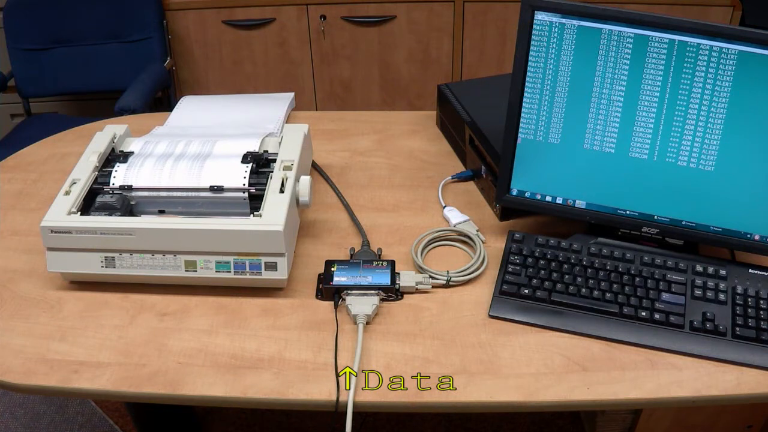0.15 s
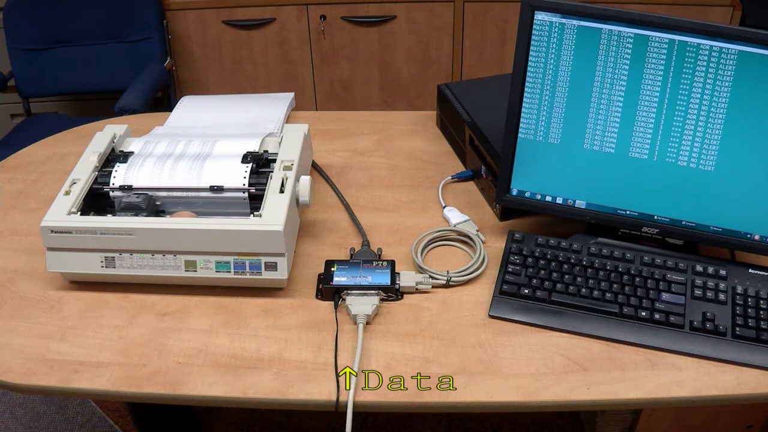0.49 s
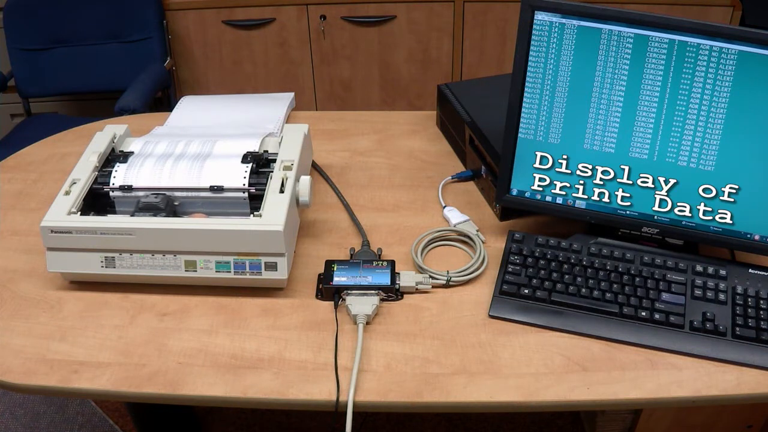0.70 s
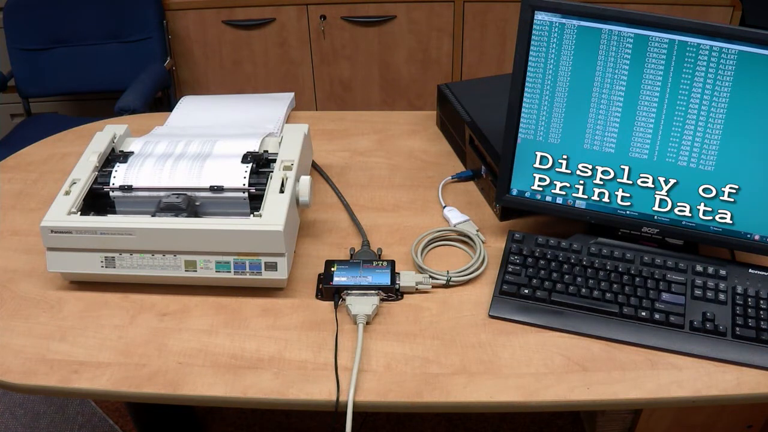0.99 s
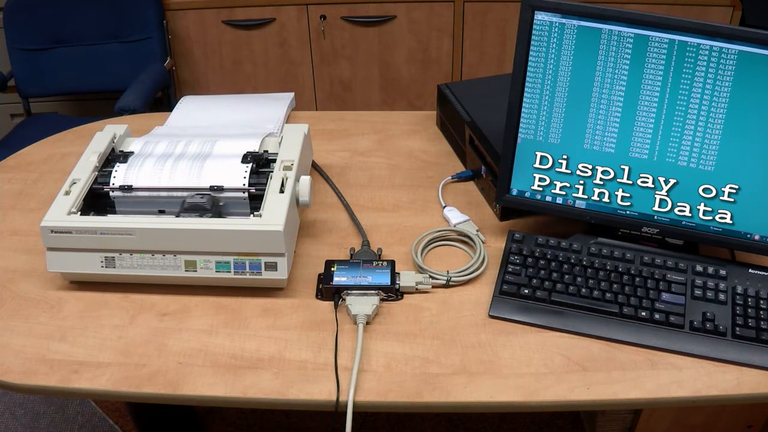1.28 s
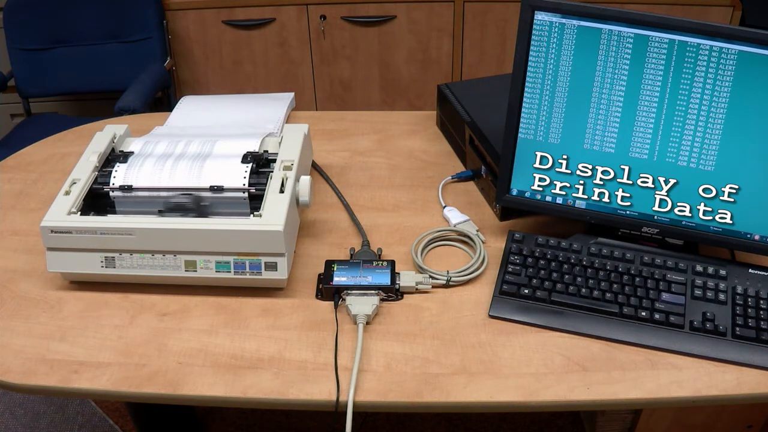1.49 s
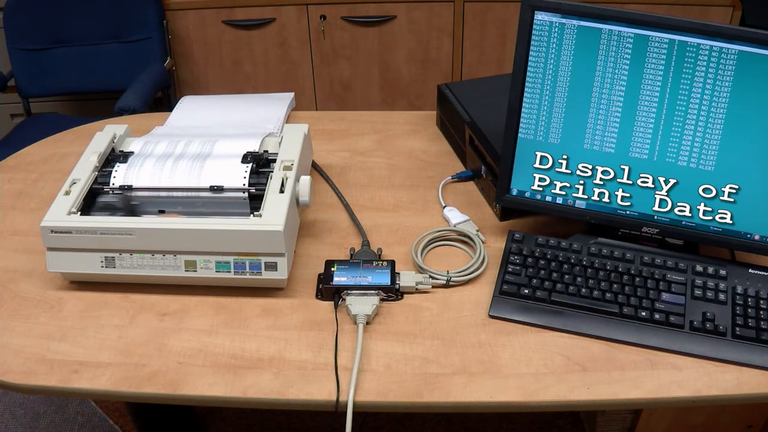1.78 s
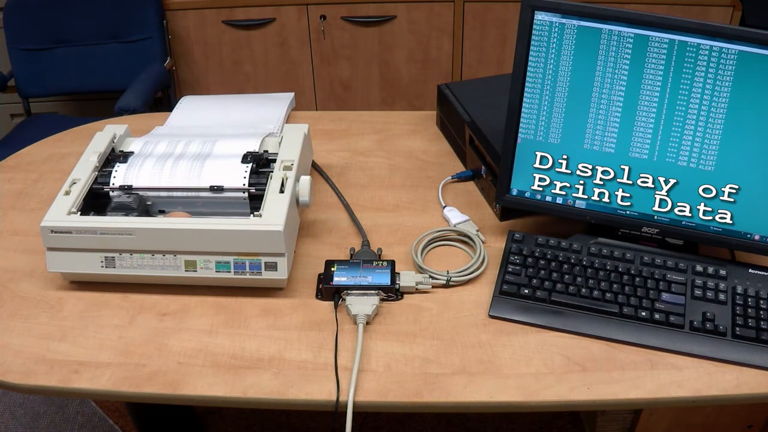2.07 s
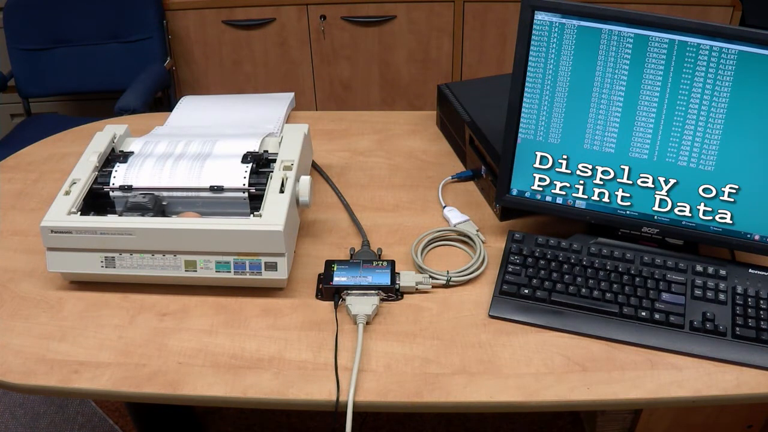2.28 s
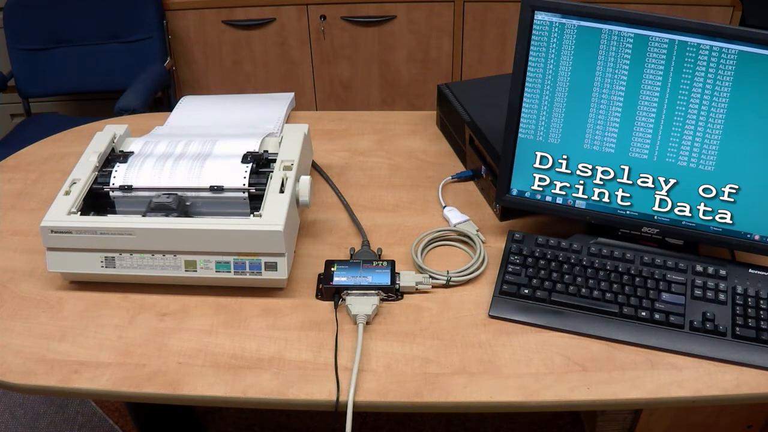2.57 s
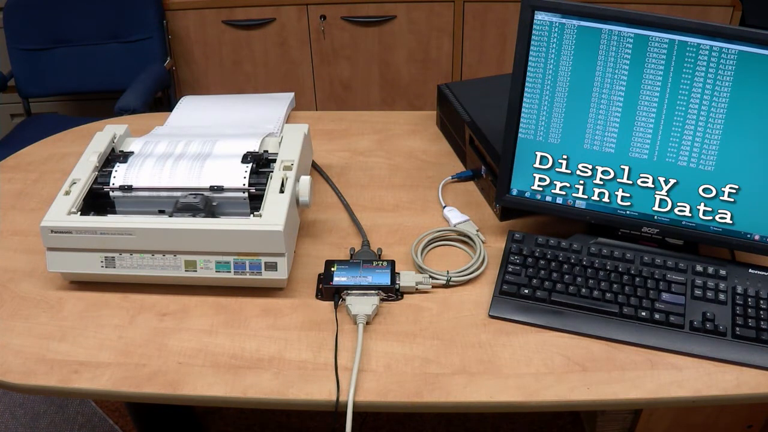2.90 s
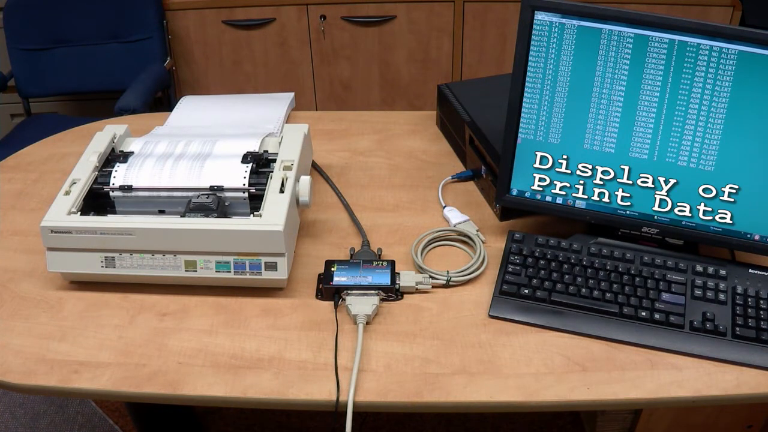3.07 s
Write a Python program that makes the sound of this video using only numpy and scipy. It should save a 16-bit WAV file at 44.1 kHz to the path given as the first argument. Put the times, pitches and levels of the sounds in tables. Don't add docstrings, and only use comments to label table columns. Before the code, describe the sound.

A dot matrix printer buzzes out two lines in harsh, raspy bursts, carriage clacking back between.

```python
import sys
import numpy as np
from scipy import signal
from scipy.fft import rfft, irfft, next_fast_len
from scipy.io import wavfile
from scipy.ndimage import uniform_filter1d, minimum_filter1d, map_coordinates

SR = 44100
rng = np.random.default_rng(int(sys.argv[2]) if len(sys.argv) > 2 else 0)


def pcm_store(signal):
    levels = np.round(np.clip(np.atleast_2d(signal), -1, 1) * 32767)
    wavfile.write(sys.argv[1], SR, levels.astype(np.int16).T)


def boost(x):
    u = np.asarray(x, float) / 20
    return 10 ** u


N = 143325

# start_s, length_s, unison (how much the needles fire together)
INKED_GROUPS = [(0.243, 0.026, 0.38), (.263, 0.045, 0.61), (0.306, 0.011, .6), (0.342, 0.015, 0.7),
                (0.358, 0.013, 0.26), (0.368, 0.038, 0.37), (0.404, 0.03, 0.24), (0.436, 0.025, 0.93),
                (0.588, 0.022, 0.74), (0.612, 0.015, 0.41), (0.636, 0.025, 0.18), (0.67, 0.032, 0.46),
                (0.704, 0.04, 1.7), (0.821, 0.079, 0.35), (0.864, 0.05, 1.8), (0.949, 0.012, 2.6),
                (1.011, 0.034, 0.12), (1.071, 0.05, 0.29), (1.134, 0.03, 0.28), (1.179, 0.058, 1),
                (1.218, 0.038, 3.7)]
# needle_db, case_share_db
GROUP_LEVELS = [
    [(-25.5, -59), (-27, -2), (-26, 2), (-31, 2), (-29, 4.5), (-40.5, 5.5), (-26.5, 1), (-28, 4),
     (-23, -11), (-29, 9.5), (-25.5, -1.5), (-28, 3.5), (-24, 3.5), (-24.5, 2), (-22.5, 4.5), (-22, 7.5),
     (-18.5, 7), (-21, 6), (-21.5, 9.5), (-21.5, 5.5), (-20.5, 7)],
    [(-22.5, -27), (-28.5, -1.5), (-25, 2.5), (-27.5, 1), (-29, -4), (-80, -15), (-28.5, 2), (-27, 3),
     (-26.5, -2), (-27, -7), (-23, -1), (-23.5, 2.5), (-23.5, -1), (-24.5, 4.5), (-24, 3), (-24, 0.5),
     (-25.5, 9), (-21.5, 6), (-22.5, 8), (-21.5, 5.5), (-21.5, 6.5)],
]
EXTRA_LENGTH = {(1, 16): .009, (1, 4): .006, (1, 17): -.003}
# centre_hz, width_hz, level_db
GUIDE_MODES = [(7758, 133, 0)]
# centre_hz, width_hz, level_db
HEAD_MODES = [(8190, 1580, 6.5), (6630, 730, -4), (9000, 760, -4.5), (5450, 620, -5), (10160, 2550, 0),
              (13300, 660, -6.5), (13200, 3600, -2)]
# centre_hz, width_hz, level_db
CASE_MODES = [(948, 790, -0.5), (1430, 520, 2), (2012, 260, -1.5), (2390, 59, 5.5), (2902, 131, 5.5),
              (3840, 1800, -5), (5380, 670, 9.5)]
# start_s, end_s, motor_hz, whine_db, slide_db
MOVES = [
    (.14, 1.53, 642.7, -52.5, -49),
    (1.38, 1.87, 481.5, -54.5, -40),
    (1.84, 3.1, 646.6, -54, -51),
    (3.096, 3.2, 383, -54, -44),
]
HARMONICS_DB = [
    [0, -50, -29.5, -70],
    [0, -9.5, -15, -15.5],
]
GROWL_DB = [-10, -10.5]
SWAY_DB = [1.2, 2.5]
# frequency_hz, density_db_per_hz
SLIDE_SPECTRUM = [(410, 0.5), (700, -9), (943, -7.5), (1020, -10.5), (1470, -12), (5640, -15), (7900, -3),
                  (14500, -16.5), (15500, -16)]
# start_s, end_s, pitch_hz, level_db
TURN_TONES = [(0.133, 0.187, 387, -40.5), (0.137, .25, 85.6, -50), (1.375, 1.428, 382, -59),
              (1.383, 1.52, 83, -62), (1.827, 1.89, 386.7, -34), (1.84, 1.955, 88, -33.5),
              (1.738, 1.82, 160.3, -41), (1.88, 1.98, 250, -46.5), (0.187, 0.262, 240, -51),
              (1.855, 1.96, 160, -49), (3.096, 3.248, 394.5, -56)]
# start_s, thump_db, scrape_db, length_s, tilt_db_per_octave
JOLTS = [(0.125, -37.5, -52, 0.039, -3), (0.189, -42, -77, 0.025, -6), (1.378, -41, -47.5, 0.04, 0.5),
         (1.408, -43.5, -54, 0.071, -11), (1.636, -44, -74, 0.043, -7), (1.739, -36, -60.5, 0.21, -6),
         (1.835, -38.5, -49, 0.036, -1), (1.887, -33, -60.5, 0.034, -9.5), (3.093, -47, -53, 0.033, -0.5),
         (3.125, -39.5, -52, 0.06, -9.5), (3.189, -45.5, -51.5, 0.033, -0.5)]
# pitch_hz, level_db, t60_s
FRAME_MODES = [(87.7, -9, 0.26), (174.5, 3, 0.11), (244, -1, 0.12), (372, 2.5, 0.091), (411, 3, 0.11),
               (567, 5.5, 0.074), (623, 1, 0.082), (811, -10.5, 0.34), (1270, -11, 0.043)]
# frequency_hz, density_db_per_hz
SCRAPE_SPECTRUM = [(290, -66), (500, -6.5), (638, -5.5), (1040, -10), (4640, -18), (7340, -10),
                   (13800, -23), (15500, -41)]
# start_s, peak_db, tilt_db_per_octave
CLICKS = [
    (.138, -39, -8),
    (1.378, -21, -4),
    (1.4028, -10, 0.5),
    (1.59, -24, 0),
    (3.164, -16, 5),
    (3.172, -19, 4),
]
# pitch_hz, level_db, t60_s
PAWL_MODES = [(2240, -16, 0.01), (5180, -7, 0.005), (8420, -2, 0.006), (10300, -8, 0.004)]
# frequency_hz, t60_s
OFFICE_T60 = [(300, 0.36), (1500, 0.29), (4000, 0.2), (12000, 0.14)]
# frequency_hz, correlation
ROOM_ALIKE = [(100, .96), (500, .7), (1200, .6), (2500, .2), (6000, .25), (14000, .1)]
# frequency_hz, difference_db
LEFT_DB = [(300, 0), (1300, .5), (2400, 1), (4400, 4.5), (7700, 5.5), (10000, 2), (15000, .5)]
# frequency_hz, lead_rad
LEFT_LEAD = [(300, 0), (2500, 0.87), (5000, 1.3), (7750, 0.75), (9500, 1.42), (13800, 2), (15600, 2.5)]
# pitch_hz, level_db
HUM = [(122, -49.5), (157, -50.5), (240, -58), (262, -75), (360, -61)]
# frequency_hz, density_db_per_hz
AIR_SPECTRUM = [(15, -47), (25, -5.5), (77, -7.5), (243, -14.5), (383, -23.5), (438, -26.5), (3260, -57),
                (13800, -39.5), (15000, -51)]
# frequency_hz, correlation
AIR_ALIKE = [(30, 0.67), (80, 0.82), (380, 0.63), (2400, 0.13), (15000, 0.12)]
# frequency_hz, level_db
MIC_TOP = [(10000, -0.5), (13000, 0.5), (14500, -0.5), (15700, -4.5)]

LINE_S = 1.7242
COLUMN_HZ, PINS = 1925.93, 24
STROKE_HZ, INKED, IN_STEP_HZ = 147.8, 0.19, 44.67
FLIGHT_S, SIZE_DB = 14e-6, 4.5
STEM, STEM_S = 1.9, 0.0017
RELEASE_S = 0.0031
PRINT_DB, CASE_DB, GUIDE_DB = 8, -20, -4
RATTLE_S = 0.0067
GUIDE_RATTLE_DB, HEAD_RATTLE_DB, CASE_RATTLE_DB = 2, 16, 2
CLUSTER_DB, CLUSTER_HZ = 2.5, 60
SHIFT_DB, SHIFT_HZ = 3, 22
GROWL_HZ, START_SPEED = 152.2, 0.37
WIND_UP_S, EDGE_S, SLIDE_EDGE_S = .04, 0.0101, .045
SLIDE_SWAY_DB = 1.2
CRACK_SHARE, CRACK_S = 1.1, .008
ROOM_DB, THUMP_WET_DB = -3, -8
AIR_DB = -46
LOW_HZ, TOP_HZ, TOP_EDGE_HZ = 50.5, 15900, 350
KNEE_DB, SQUEEZE, MOST_DB = -31, .9, 8.5
SENSE_S, HOLD_S, RECOVER_DB_PER_S = .006, .3, 14


def unit(x):
    return x / np.sqrt(np.mean(x ** 2) + 1e-20)


def along(points, hz):
    f, value = np.transpose(points)
    return np.interp(np.log(hz + 1), np.log(f + 1), value)


def wobble(rate, s, count):
    knots = rng.standard_normal((count, 2000))
    return np.array([map_coordinates(k, [s * rate], mode="wrap") for k in knots])


def filtered(x, response):
    m = next_fast_len(N + SR // 2)
    return irfft(rfft(x, m) * response(np.fft.rfftfreq(m, 1 / SR)), m)[..., :N]


def resonances(modes):
    def response(f):
        total = 0
        for k, (centre, width, db) in enumerate(modes):
            damping = 1j * f * width
            total = total + (-1) ** k * boost(db) * damping / (centre * centre - f * f + damping)
        return total
    return response


def hiss(spectrum):
    return unit(filtered(rng.standard_normal(N), lambda hz: boost(along(spectrum, hz))))


def pulses(s, size):
    at = np.floor(s * SR).astype(int)[:, None] + np.arange(-8, 8)
    u = at - s[:, None] * SR
    shape = size[:, None] * np.sinc(u) * (1 + np.cos(np.pi * u / 8)) / 2
    return np.bincount(at.ravel(), shape.ravel(), N + SR)[:N]


def ring(modes, t):
    return sum(boost(db + rng.normal(0, 4.3) - 60 * t / t60) * np.sin(2 * np.pi * hz * t)
               for hz, db, t60 in modes)


def printed_text(s):
    force, share, stem, unison = np.zeros((4, len(s)))
    for line, levels in enumerate(GROUP_LEVELS):
        for group, (place, (db, case_db)) in enumerate(zip(INKED_GROUPS, levels)):
            start, length, together = place
            since = s - start - line * LINE_S
            length = length + EXTRA_LENGTH.get((line, group), 0)
            late = np.clip(since - length, 0, None) / RELEASE_S
            on = (since > 0) & (late < 4)
            force[on] = boost(db + PRINT_DB) * np.exp(-late[on])
            share[on] = boost(case_db + CASE_DB)
            stem[on] = STEM * np.exp(-since[on] / STEM_S)
            unison[on] = together
    return force, share, stem, unison


def needles():
    column = np.arange(int(N / SR * COLUMN_HZ))
    s = column / COLUMN_HZ
    force, share, stem, unison = printed_text(s)
    common_choice = unison * wobble(IN_STEP_HZ, s, count=1)
    odd = common_choice + .5 * wobble(IN_STEP_HZ, s, count=PINS) > 0
    stroke = wobble(STROKE_HZ, s, count=PINS) + stem > -INKED
    fires = stroke & ((column % 2 == 1) == odd)
    size = (fires * boost(SIZE_DB * rng.standard_normal(fires.shape))).ravel()
    when = (s + FLIGHT_S * rng.standard_normal(fires.shape)).ravel() + 1 / COLUMN_HZ

    rattle_decay = boost(-60 * np.arange(SR // 50) / SR / RATTLE_S)

    def shake(blows):
        return signal.fftconvolve(np.abs(blows), rattle_decay)[:N]

    steady = pulses(when, size)
    steady_shake = shake(steady)
    case_drive = force * share * boost(CLUSTER_DB * wobble(CLUSTER_HZ, s, count=1)[0])
    bodies = [(GUIDE_MODES, force * boost(GUIDE_DB), GUIDE_RATTLE_DB, .4),
              (HEAD_MODES, force, HEAD_RATTLE_DB, .4),
              (CASE_MODES, case_drive, CASE_RATTLE_DB, 1)]
    out = 0
    for body, drive, rattle_db, shift_share in bodies:
        rattle = boost(rattle_db) * np.std(steady) / np.std(steady_shake)
        noise = rattle * rng.standard_normal(N) / 2
        blows = pulses(when, size * np.tile(drive, PINS))
        excitation = blows + noise * shake(blows)
        modes = filtered(excitation, lambda f: np.array(
            [(-1) ** k * resonances([mode])(f) for k, mode in enumerate(body)]))
        coarse_s = np.arange(0, N + 64, 64) / SR
        shift = boost(SHIFT_DB * shift_share * wobble(SHIFT_HZ, coarse_s, count=len(body)))
        shift = uniform_filter1d(np.repeat(shift, 64, axis=1), size=64, axis=1)[:, :N]
        reference = filtered(steady + noise * steady_shake, resonances(body))
        out = out + (shift * modes).sum(0) / np.std(reference)
    return out


def carriage():
    t, out, slide = np.arange(N) / SR, 0, hiss(SLIDE_SPECTRUM)

    def edges(start, end, edge_s):
        return np.clip(np.minimum(t - start, end - t) / edge_s, 0, 1)

    for move, (start, end, hz, whine_db, slide_db) in enumerate(MOVES):
        way = move % 2
        gate = edges(start + WIND_UP_S, end, EDGE_S)
        glide = edges(start, end, SLIDE_EDGE_S)
        sway = wobble(24.15, t, count=2)
        speed = START_SPEED + (1 - START_SPEED) * gate
        phase = 2 * np.pi * hz * np.cumsum(speed) / SR
        whine = boost(GROWL_DB[way] + sway[1]) * np.sin(2 * np.pi * GROWL_HZ * t + sway[0])
        for k, db in enumerate(HARMONICS_DB[way]):
            whine = whine + boost(db) * np.sin((k + 1) * phase + 0.28 * sway[1])
        out = out + gate * boost(whine_db + 6.5 + SWAY_DB[way] * sway[0]) * whine
        out = out + glide * boost(slide_db + SLIDE_SWAY_DB * sway[1]) * slide
    for start, end, hz, db in TURN_TONES:
        sway = wobble(31.53, t, count=2)
        tone = np.sin(2 * np.pi * hz * t + 0.16 * sway[1])
        out = out + edges(start, end, 0.017) * boost(db + 7.5 + SWAY_DB[0] * sway[0]) * tone
    return out


def tilted(modes, tilt_db, pivot_hz):
    return [(hz, db + tilt_db * np.log2(hz / pivot_hz), t60) for hz, db, t60 in modes]


def jolts():
    out, t = np.zeros(N + SR), np.arange(SR // 2) / SR
    scrape = np.tile(hiss(SCRAPE_SPECTRUM), 2)
    for s, thump_db, scrape_db, length, tilt_db in JOLTS:
        first = round(s * SR)
        swell = (t / length * 2 * np.exp(1 - t / length * 2)) ** 2 / 2
        push = rng.standard_normal(len(t)) * swell
        frame = ring(tilted(FRAME_MODES, tilt_db, 200), t)
        thump = signal.fftconvolve(push / np.linalg.norm(push), frame)[:len(t)]
        out[first:][:len(t)] += boost(thump_db + 4.5) * thump
        out[first:][:len(t)] += boost(scrape_db + 16.5) * swell * scrape[first:][:len(t)]
    for s, db, tilt_db in CLICKS:
        pawl = ring(tilted(PAWL_MODES, tilt_db, 2200), t)
        crack = boost(tilt_db) * boost(-60 * t / CRACK_S) * rng.standard_normal(len(t))
        out[round(s * SR):][:len(t)] += boost(db - 9.0) * (pawl + CRACK_SHARE * crack)
    return out[:N]


def mid_side_angle(alike, hz):
    return np.arccos(np.clip(along(alike, hz), -1, 1)) / 2


def room(x):
    out, step = np.zeros((2, N + SR)), SR // 10
    for i in range(0, N, step):
        hz, t, z = signal.stft(rng.standard_normal((2, SR // 3)), SR, nperseg=128)
        angle = mid_side_angle(ROOM_ALIKE, hz)[:, None]
        z = np.cos(angle) * z[0] + np.sin(angle) * z[1] * [[[1]], [[-1]]]
        decay = boost(-60 * t / along(OFFICE_T60, hz)[:, None])
        tail = signal.istft(z * decay, SR, nperseg=128)[1]
        wet = signal.fftconvolve(x[None, i:i + step], tail / np.linalg.norm(tail[0]), axes=1)
        out[:, i + 60:i + 60 + wet.shape[1]] += wet
    return out[:, :N]


def office_air():
    t = np.arange(N) / SR

    def spread(hz):
        angle = mid_side_angle(AIR_ALIKE, hz)
        return boost(along(AIR_SPECTRUM, hz)) * [np.cos(angle), np.sin(angle)]

    mid, side = filtered(rng.standard_normal((2, N)), spread)
    sways = wobble(12, t, count=len(HUM))
    hum = sum(boost(db + sway) * np.sin(2 * np.pi * hz * t + 2.08 * sway)
              for (hz, db), sway in zip(HUM, sways))
    return boost(AIR_DB) * unit(np.array([mid + side, mid - side])) + hum


def scene():
    head, knocks = needles(), jolts()
    side = np.array([[.5], [-.5]])
    reverb = room(head + boost(THUMP_WET_DB) * knocks)
    heard = head + knocks + carriage() + boost(ROOM_DB) * reverb
    placed = filtered(heard, lambda hz: boost(side * along(LEFT_DB, hz))
                      * np.exp(1j * side * along(LEFT_LEAD, hz)))
    return placed + office_air()


def top_cut(x):
    return signal.sosfilt(signal.butter(12, 16800, fs=SR, output="sos"), x)


def record(dry):
    t, width = np.arange(N) / SR, int(SENSE_S * SR)

    def behind(v):
        return signal.fftconvolve(v, np.ones(width) / width)[:N]

    level_db = 10 * np.log10(np.abs(behind(np.mean(dry ** 2, 0))) + 1e-12)
    wanted_db = np.clip(SQUEEZE * (level_db - KNEE_DB), 0, MOST_DB)
    hold = int(HOLD_S * SR) // 2
    held_db = -minimum_filter1d(-wanted_db, 2 * hold + 1, origin=hold, mode="nearest")
    recovery_db = RECOVER_DB_PER_S * t
    duck_db = np.maximum.accumulate(held_db + recovery_db) - recovery_db

    def microphone(hz):
        low_cut = (1j * hz / (LOW_HZ + 1j * hz)) ** 2
        top_edge = np.clip((TOP_HZ - hz) / TOP_EDGE_HZ, 0, 1) ** 2
        return top_edge * low_cut * boost(along(MIC_TOP, hz))

    mix = filtered(dry * boost(-behind(duck_db)), microphone)
    return top_cut(mix)


dry = scene()
out = record(dry)
pcm_store(out)
```